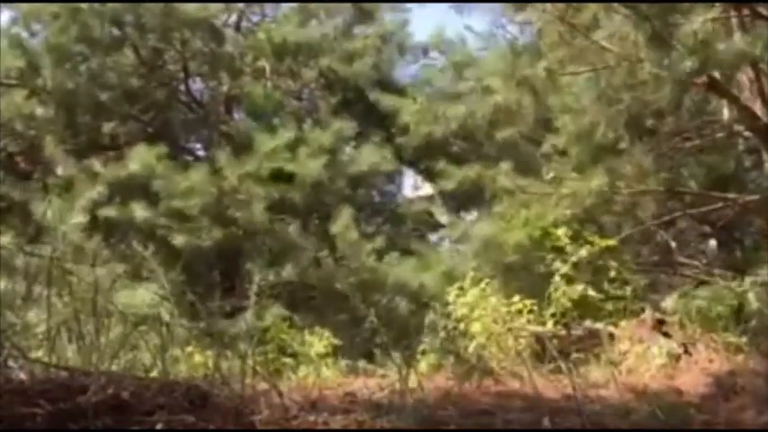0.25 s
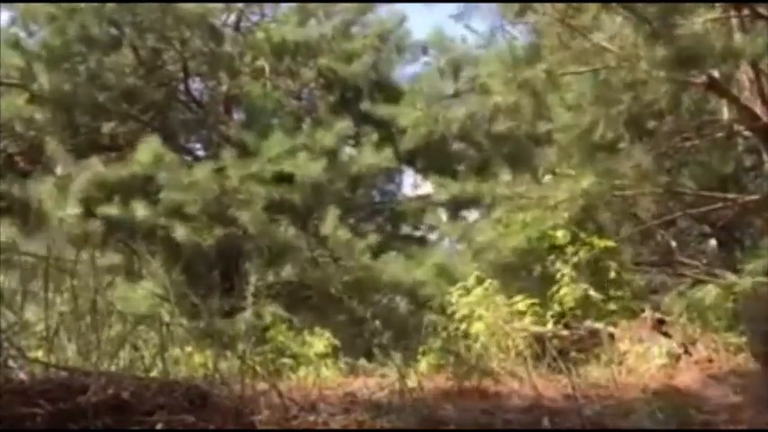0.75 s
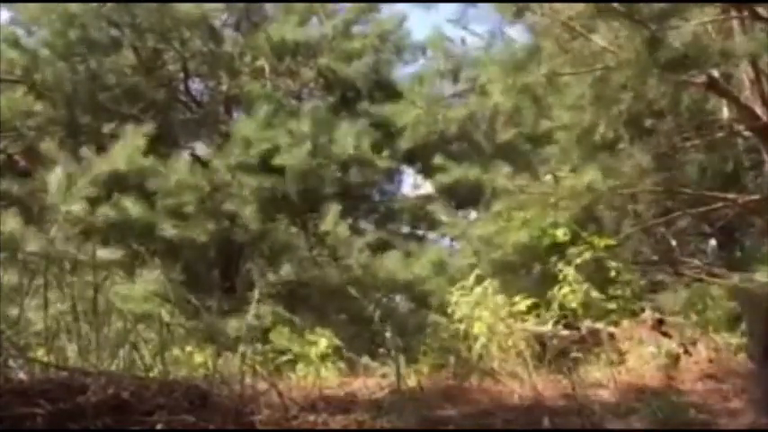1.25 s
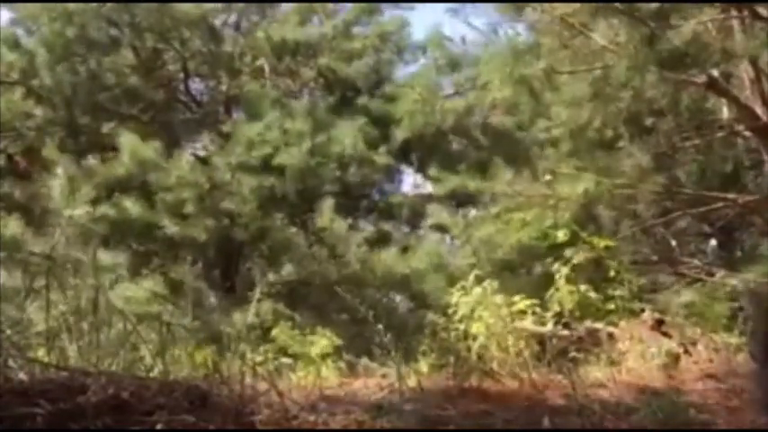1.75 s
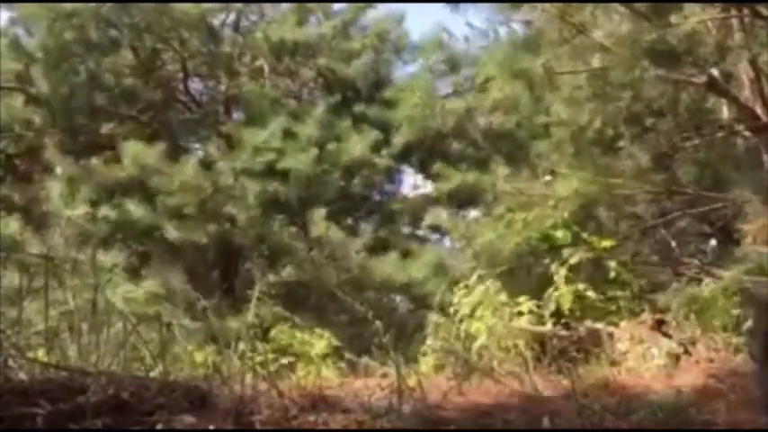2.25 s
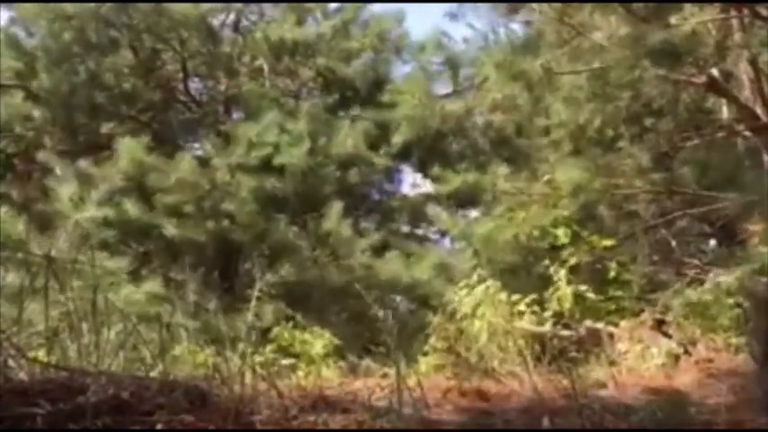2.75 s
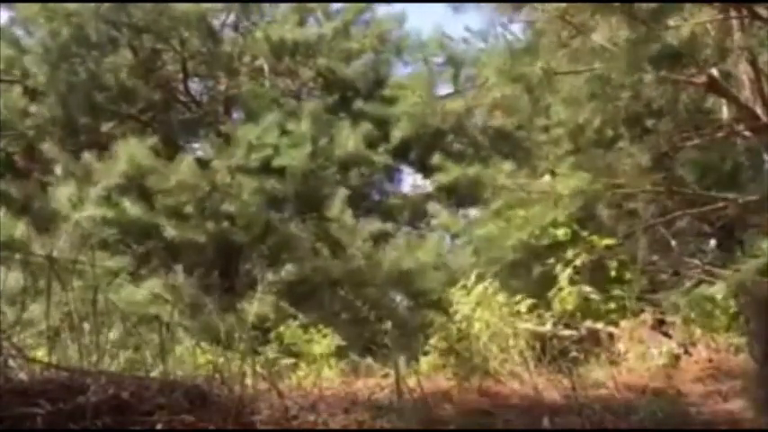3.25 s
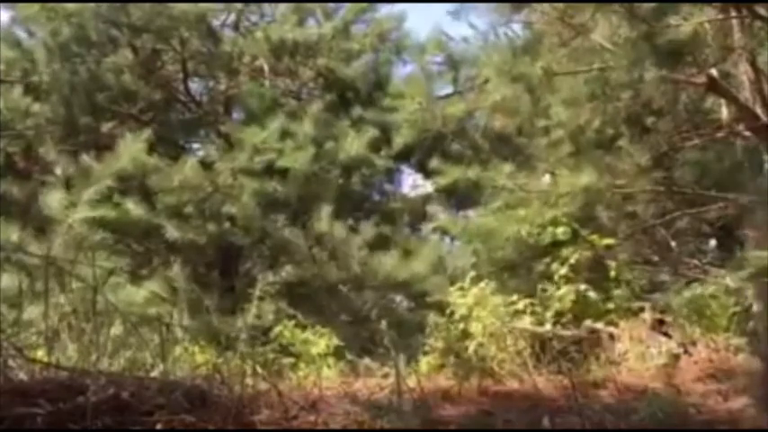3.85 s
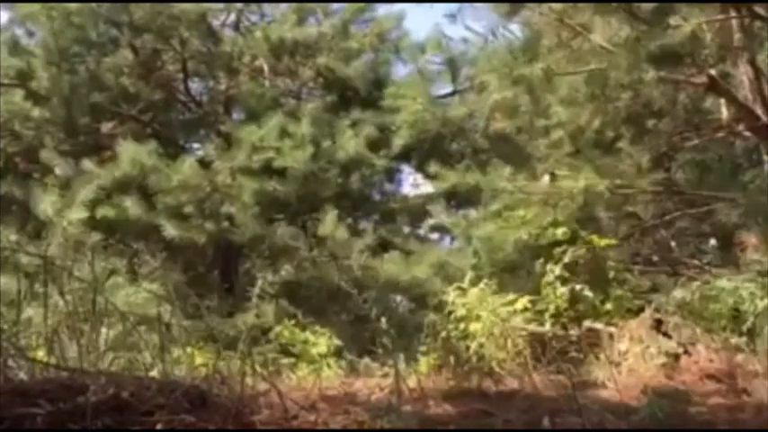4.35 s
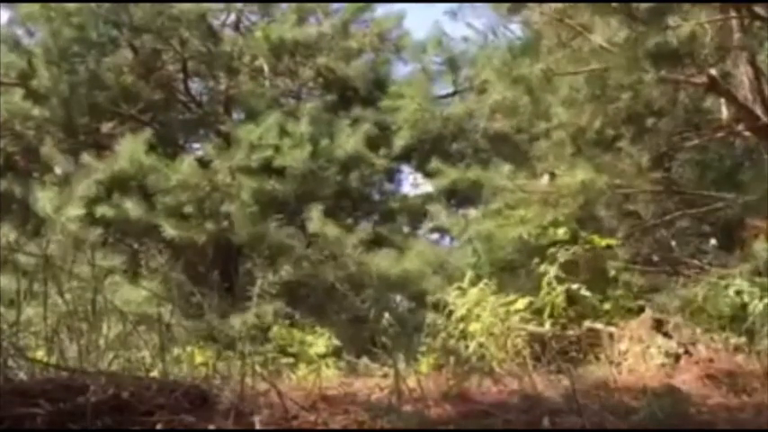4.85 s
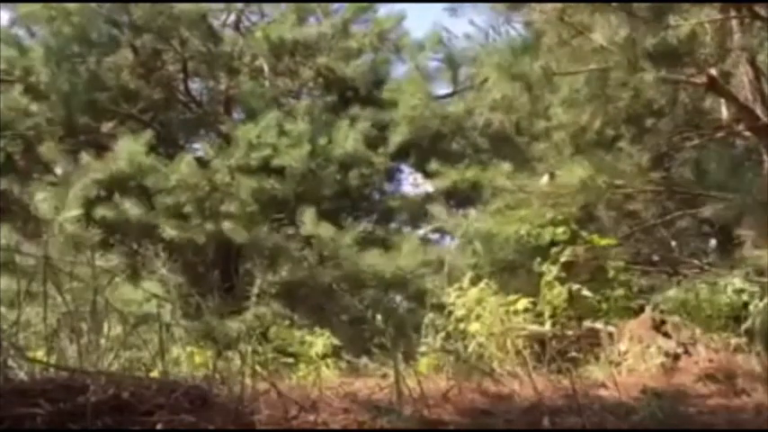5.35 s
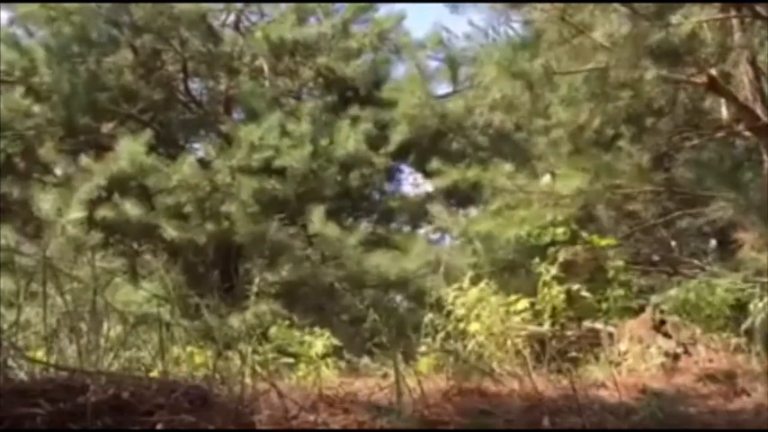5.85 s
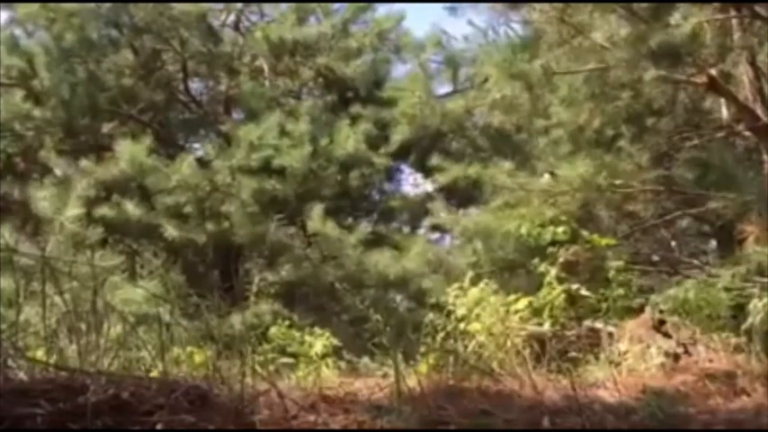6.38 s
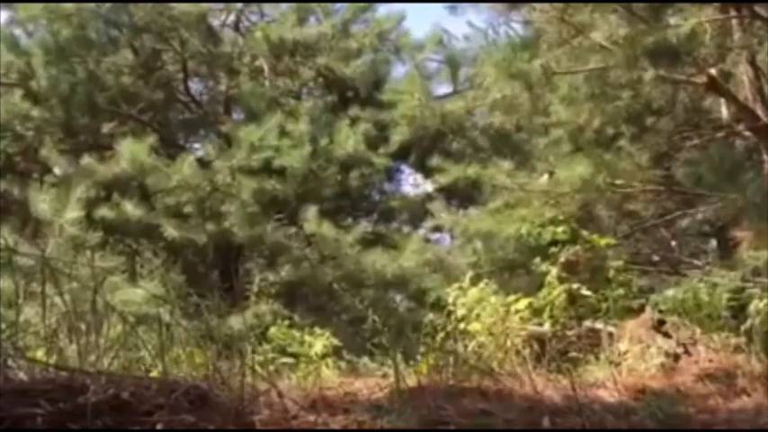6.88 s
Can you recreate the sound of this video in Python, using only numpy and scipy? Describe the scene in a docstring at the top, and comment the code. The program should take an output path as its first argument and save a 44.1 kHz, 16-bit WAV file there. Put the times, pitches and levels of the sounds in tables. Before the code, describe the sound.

Quick, raspy squirrel chatter thins out to softer single squeaks among the trees, with light breeze bumping the microphone.

```python
"""Rattling barks come first: a squirrel scolding from the pines, on one microphone in a quiet wood.
The barks and three hard squeals slow into yelps and single falling squeaks. Each note is a gliding
throat tone of uneven pitch; hard notes add a rasp and a sharp hiss of air. Nearby twigs and trunks
further off scatter the calls faintly. Breeze buffets the microphone; two small ticks sound late on."""
import sys
import numpy as np
from scipy import signal
from scipy.fft import rfft, irfft
from scipy.io import wavfile
from scipy.ndimage import uniform_filter1d

SR = 44100
rng = np.random.default_rng(int(sys.argv[2]) if len(sys.argv) > 2 else 0)


def inscribe(sig):
    """Save sig as 16-bit PCM at rate SR to the path in sys.argv[1].

    A 1-D sig is mono; a 2-D sig holds one channel per row.
    Samples are clipped to [-1, 1] before scaling.
    """
    pcm = np.round(np.clip(np.atleast_2d(sig).T, -1, 1) * 32767)
    wavfile.write(sys.argv[1], SR, pcm.astype(np.int16))


N = 313992


def undb(db):
    """Decibels to gain."""
    return 10 ** (np.asarray(db) / 20)


def unit(x):
    """Scale to rms 1."""
    return x / np.sqrt(np.mean(x ** 2) + 1e-18)


def gains(spectrum, hz):
    """Gain of a spectrum (f/Hz, level/dB) at the given frequencies."""
    f, db = np.transpose(spectrum)
    return undb(np.interp(np.log(hz + 1), np.log(f), db))


def colour(x, spectrum):
    """Filter by a spectrum (f/Hz, level/dB) that falls away beyond its ends."""
    hz = np.arange(len(x) // 2 + 1) * SR / len(x)
    skirts = np.minimum(hz / spectrum[0][0], 1) ** 2 * np.minimum(spectrum[-1][0] / (hz + 1), 1) ** 2
    return irfft(rfft(x) * gains(spectrum, hz) * skirts, len(x))


def noise(spectrum):
    """Coloured noise at rms 1, as long as the scene."""
    return unit(colour(rng.standard_normal(N), spectrum))


def resonance(x, hz, width_hz):
    """One resonance with gain 1 at its centre."""
    return signal.lfilter(*signal.iirpeak(hz, hz / width_hz, fs=SR), x)


def drift(rate_hz, size):
    """Smooth random drift with spread near 1."""
    place = np.arange(size) * rate_hz / SR
    return 1.2 * np.interp(place, np.arange(1024), rng.standard_normal(1024))


def gate(t, length, attack, release):
    """Opens at 0 and closes after length, with soft edges; all in seconds."""
    return (1 + np.tanh(t / attack)) * (1 + np.tanh((length - t) / release)) / 4


def glide(hz, start, end):
    """Pitch at the start, middle and end of a note; start and end are ratios to the middle."""
    return hz * start, hz, hz * end


# The throat's broad low resonance: f/Hz, level/dB
THROAT = [(130, -28), (260, -34.5), (370, 3), (550, 0), (1000, 2), (1350, -0.5), (1700, -11), (2100, -22),
          (2700, -32.5)]
HARMONICS = np.arange(1, 13)[:, None]


def throat_voice(partials, pitch, air, rough):
    """The throat carries the first harmonics, with more breath in a rough note."""
    tone = (partials * gains(THROAT, HARMONICS * pitch) * HARMONICS ** -1.35).sum(axis=0)
    return unit(tone) + 1.68 * rough ** 1.77 * unit(colour(air, THROAT))


# The mouth's upper resonances: f/Hz, level/dB
MOUTH = [(1500, -22.5), (2200, -19), (2700, -14.5), (3150, 0), (3700, 1.5), (4100, 3.5), (4600, -5.5),
         (6200, -4), (7500, -30)]
# Extra resonances of soft notes, jaws nearly shut: f/Hz, width/Hz, level/dB
SHUT_JAW = [(2480, 600, 5.5), (3645, 130, 5)]


def mouth_rasp(partials, pitch, air, rough, level_db):
    """Buzz and breath ring in the mouth; the jaws open for loud notes and move the rasp upwards."""
    buzz = (partials * gains(MOUTH, HARMONICS * pitch) * HARMONICS ** -.4).sum(axis=0)
    rasp = unit(buzz) + (.2 + 1.4 * rough ** 2) * unit(colour(air, MOUTH))
    gape = min(undb(4.7 * (level_db + 43.5)), 1)
    open_jaw = resonance(rasp, hz=5010, width_hz=520)
    shut_jaw = sum(undb(db) * resonance(rasp, hz, width) for hz, width, db in SHUT_JAW)
    return rasp + 1.65 * gape * open_jaw + (1 - gape) * shut_jaw


# Air forced past the teeth: f/Hz, level/dB
TEETH = [(4500, -17), (6300, -14), (7100, -1), (8300, 1), (8750, -3.5), (9200, -11), (9950, -5),
         (10800, -7), (12000, -7.5), (12700, -18.5), (13700, -6.5), (15000, -11.5)]
# Whistles at the teeth: f/Hz, width/Hz, level/dB
WHISTLES = [(8290, 850, -0.5), (9900, 450, 8)]


def teeth_hiss(air, level_db):
    """Air hisses past the teeth and whistles on the hardest notes."""
    hiss = colour(air, TEETH)
    whistle = sum(undb(db) * resonance(hiss, hz, width) for hz, width, db in WHISTLES)
    return hiss + min(undb(level_db + 23), 2) * whistle


NOTE_SAMPLES, LEAD_SAMPLES = 4096, 512  # room for one note; the part of it before the onset


def note(length, pitches, rough, voice_db, rasp_db, hiss_db):
    """One push of air: a gliding, jittering tone with its rasp and hiss."""
    t = (np.arange(NOTE_SAMPLES) - LEAD_SAMPLES) / SR
    length = max(length, .004)
    progress = np.clip(t / length, -.05, 1.05)
    arc = np.polyfit([0, .5, 1], np.log(pitches), 2)
    contour = np.exp(np.polyval(arc, progress))
    # rough notes have cycles of uneven length and strength
    pitch = contour * np.exp(.149 * rough ** 2.8 * drift(600, NOTE_SAMPLES))
    flutter = undb(4.8 * rough * drift(320, NOTE_SAMPLES))
    phase = 2 * np.pi * np.cumsum(pitch) / SR
    partials = np.sin(HARMONICS * phase) * (HARMONICS * pitch < SR / 3)
    air = rng.standard_normal((3, NOTE_SAMPLES)) * (1 + .5 * np.cos(phase))  # escapes once a cycle
    # pressure raises pitch and loudness together; the upper sounds die first as it sinks
    pressure = contour / contour.max()

    voice = throat_voice(partials, pitch, air[0], rough)
    voice *= gate(t, length, attack=.00071 + .13 * length, release=.0011)
    voice *= np.exp(-.25 * progress) * pressure ** .5 * flutter
    # the rasp stops with the tone, while the hiss trails a little
    rasp = mouth_rasp(partials, pitch, air[1], rough, rasp_db)
    rasp *= gate(t - .061 * length, .93 * length, attack=.00081 + .06 * length, release=.0016)
    rasp *= np.exp(-.6 * progress) * pressure ** 2.5 * flutter
    jet = gate(t - .018 * length, length, attack=.00028 + .084 * length, release=.0061)
    jet *= np.exp(-.7 * progress) * pressure ** 1.5 * flutter ** .5
    leak = undb(-42.5) * gate(t, length, attack=.006, release=.0068)  # air between a bark's pulses
    hiss = teeth_hiss(air[2], hiss_db) * (jet + leak)

    def at_level(x, db):
        """Bring the rms, taken over the note's length, to db."""
        return x * undb(db) / np.sqrt(np.sum(x ** 2) / (length * SR) + 1e-18)

    return at_level(voice, voice_db) + at_level(rasp, rasp_db) + at_level(hiss, hiss_db)


CATCH_LEAD_S, CATCH_S, CRY_S, LAST_PULSE_S = .016, .0038, .018, .025
RATTLE_END_HZ, VOICE_FADE_DB, TREBLE_FADE_DB = 450, 1.16, 7.5  # fades are per pulse
# Barks from the pines: t/s, chirp to cry/s, pulse spacing/s, pulse count, chirp f/Hz, cry f/Hz,
# rattle f/Hz, roughness/0-1, voice/dB, rasp/dB, hiss/dB, cry's rasp and hiss over the chirp's/dB,
# rattle voice/dB, rattle rasp/dB
BARKS = [(-0.021, 0.016, 0.027, 2, 800, 778, 643, 0.72, -36.5, -40.5, -28.5, 1, -36.5, -44),
         (0.134, 0.02, 0.021, 3, 808, 788, 649, 0.7, -36.5, -37, -30.5, -2, -39, -45),
         (0.300, .017, .027, 3, 640, 777, 635, 0.73, -38.5, -37, -32.5, -2, -38, -47.5),
         (0.482, .017, 0.025, 4, 827, 779, 643, .7, -37, -39.5, -31.5, 0.5, -36, -43),
         (0.684, 0.017, .025, 2, 616, 770, 627, 0.71, -37.5, -35, -30.5, -1.5, -41.5, -56),
         (0.835, .019, 0.023, 2, 716, 685, 475, 0.86, -40.5, -42.5, -39, 5, -41.5, -76),
         (0.973, .020, .025, 2, 914, 884, 628, .66, -37, -39.5, -35.5, -2, -39, -59.5),
         (1.129, 0.018, .027, 4, 821, 1015, 657, 0.74, -38, -38.5, -35.5, 3.5, -37, -51.5),
         (1.715, 0.019, 0.026, 4, 963, 700, 576, 0.6, -37.5, -37.5, -32.5, -6, -36, -45),
         (1.915, 0.02, 0.025, 2, 982, 655, 541, 0.58, -36, -42, -36, -2.5, -38.5, -58),
         (2.089, .019, 0.026, 2, 974, 659, 567, 0.64, -36.5, -40, -35.5, -4.5, -39, -59),
         (2.247, 0.019, 0.022, 1, 975, 1035, 648, 0.56, -33.5, -36, -31, -6.5, -43.5, -65),
         (2.379, .018, 0.021, 1, 1076, 1035, 762, 0.47, -33, -38.5, -29.5, -2.5, -46.5, -58),
         (2.504, .017, 0.015, 1, 1033, 1257, 842, 0.37, -33, -42.5, -34.5, 0, -46, -64),
         (2.766, .016, 0.021, 1, 1190, 1104, 633, 0.38, -33.5, -38, -28.5, -10, -42.5, -65),
         (2.905, 0.017, 0.022, 2, 776, 635, 587, 0.6, -38, -50, -48.5, -5, -44, -74),
         (3.33, 0.012, .021, 1, 1068, 1124, 940, .46, -35, -40.5, -34, -1.5, -49.5, -75),
         (3.464, 0.018, 0.024, 2, 760, 595, 394, 0.54, -39.5, -51, -51.5, -1, -42.5, -68),
         (3.610, 0.02, 0.027, 2, 1100, 800, 450, 0.55, -37.5, -35.5, -32.5, -9, -39.5, -60),
         (5.466, .018, 0.023, 5, 794, 559, 570, 0.5, -43, -59, -60, -2, -41, -66),
         (5.912, 0.016, .027, 2, 783, 495, 560, 0.54, -40.5, -69, -61, 3, -43.5, -64)]


def bark(start, to_cry, spacing, pulses, chirp_hz, cry_hz, rattle_hz, rough,
         voice_db, rasp_db, hiss_db, cry_db, rattle_db, rattle_rasp_db):
    """The throat catches, chirps up and cries down; the air runs out in sinking, dulling pulses."""
    levels = np.array([voice_db, rasp_db, hiss_db])
    catch_levels = levels + (.5, -12, -14) - 32 * (1 - rough)  # faint before a clean bark
    yield start - CATCH_LEAD_S, note(CATCH_S, glide(529, 1.12, .84), rough, *catch_levels)
    yield start, note(.6 * to_cry, glide(chirp_hz, .8, 1.1), rough, *levels)
    cry_levels = levels + (0, cry_db, cry_db)
    yield start + to_cry, note(CRY_S, glide(cry_hz, 1.15, .76), rough, *cry_levels)
    for k, spent in enumerate(np.linspace(0, 1, pulses)):
        hz = rattle_hz * (RATTLE_END_HZ / rattle_hz) ** (spent ** 2.2)  # holds at first, sinks late
        if k < pulses - 1:
            length, pitches = .7 * spacing, glide(hz, .93, 1.04)
        else:
            length, pitches = LAST_PULSE_S, glide(hz, 1.12, .84)
        treble_db = rattle_rasp_db - k * TREBLE_FADE_DB
        pulse = note(length, pitches, .81 * rough, rattle_db - k * VOICE_FADE_DB, treble_db, treble_db + .5)
        yield start + to_cry + (k + 1) * spacing, pulse


def trees(x, near_db, near_t60, far_db, far_t60):
    """Nearby twigs smear each note; trunks further off return a faint tail."""
    t = np.arange(SR // 2) / SR
    onset = 1 - np.exp(-t / .0016)
    response = 0
    for db, t60 in ((near_db, near_t60), (far_db, far_t60)):
        tail = rng.standard_normal(len(t)) * np.exp(-np.log(1000) * t / t60) * onset
        response += undb(db) * tail / np.linalg.norm(tail)
    return signal.fftconvolve(x, response)[:N]


# Distant air in the wood: f/Hz, level/dB
WOOD_AIR = [(18, -32), (30, -14), (87, -1), (195, -13), (288, -13.5), (364, -17), (538, -15.5),
            (1030, -18.5), (1110, -18), (1370, -26), (1920, -30), (3780, -33.5), (4900, -34), (8920, -38.5),
            (15000, -47)]
# Leaf hiss, strongest early on: t/s, level/dB
LEAF_LEVELS = [(0, -69.5), (1.25, -59.5), (1.6, -71), (3.0, -67), (4.2, -83), (7.12, -71)]


def wood():
    """Distant air in the trees and a light hiss of leaves."""
    far_air = noise(WOOD_AIR) * undb(-52 + 1.3 * drift(4.4, N))
    leaves = noise([(1500, -11), (4000, 1), (8300, -6), (12000, -10), (15000, -12)])
    leaf_db = np.interp(np.arange(N) / SR, *np.transpose(LEAF_LEVELS))
    return far_air + leaves * undb(leaf_db + 1.08 * drift(27, N))


# Wind rumble right at the microphone: f/Hz, level/dB
BUFFET = [(18, -21), (32, -11.5), (48, 0.5), (68, 8), (100, -7.5), (150, -11), (220, -21.5), (400, -62)]
# Gusts on the microphone: peak t/s, half length/s, level/dB
GUSTS = [(0.047, 0.03, -46.5), (0.36, 0.094, -36), (0.498, 0.04, -37.5), (0.615, 0.055, -38),
         (0.958, 0.03, -49), (1.187, 0.096, -51), (1.567, 0.016, -37), (1.792, 0.031, -32.5),
         (1.88, 0.034, -45), (2.016, 0.068, -39.5), (2.527, 0.054, -53), (4.123, 0.15, -56)]


def breeze():
    """Low eddies buffet the microphone, in gusts over a faint wavering draught."""
    t = np.arange(N) / SR
    eddies = noise(BUFFET)
    eddies /= np.sqrt(uniform_filter1d(eddies ** 2, size=3000) + .02)  # even strength within a gust
    gusts = sum(undb(db) * np.exp(-((t - peak) / half) ** 2) for peak, half, db in GUSTS)
    draught = undb(-57.5 + 2.4 * drift(7.1, N))
    return eddies * (gusts + draught)


# Spits of air ahead of some barks: t/s, length/s, level/dB
SPITS = [(0.464, 0.021, -48.5), (0.666, 0.019, -42.5), (0.818, 0.023, -44), (0.957, 0.018, -51),
         (5.391, 0.026, -60.5)]
# Their colour at the teeth: f/Hz, level/dB
SPIT_SPECTRUM = [(3800, -16), (4700, 3.5), (6000, -6), (7600, 5), (9500, -11), (11800, 3), (15000, -17)]


def spits():
    """Unvoiced air spits through the teeth, starting and stopping sharply."""
    t = np.arange(N) / SR
    bursts = sum(undb(db) * gate(t - start, length, attack=.0018, release=.002)
                 for start, length, db in SPITS)
    return bursts * noise(SPIT_SPECTRUM)


# Hard squeals: t/s, rise/s, hold/s, rise f/Hz, hold f/Hz, hold roughness/0-1, rise voice/dB,
# rise rasp/dB, rise hiss/dB, hold voice/dB, hold rasp/dB, hold hiss/dB, mouth ring/dB
SQUEALS = [(1.339, .009, 0.024, 1193, 1652, 0, -30, -40.5, -20, -50.5, -47, -22.5, 9.5),
           (1.447, .018, .016, 1482, 1400, .45, -34, -36.5, -19, -47, -45, -43, -9),
           (3.775, .014, .021, 1392, 1345, 0.51, -36, -33, -26, -40.5, -33.5, -29, -10.5)]


def squeal(start, rise_s, hold_s, rise_hz, hold_hz, rough, voice_db, rasp_db, hiss_db,
           hold_db, hold_rasp_db, hold_hiss_db, ring_db, rise_rough=.42, break_s=.0025):
    """The pitch shoots up, then holds on a thin hissing note whose overtone rings in the mouth."""
    yield start, note(rise_s, glide(rise_hz, .79, 1.2), rise_rough, voice_db, rasp_db, hiss_db)
    held = note(hold_s, glide(hold_hz, .96, .94), rough, hold_db, hold_rasp_db, hold_hiss_db)
    ring = undb(ring_db) * resonance(held, hz=3280, width_hz=200)
    yield start + rise_s + break_s, held + ring


# Yelps: t/s, note/s, whine/s, note f/Hz, bend (end over middle pitch), whine f/Hz, roughness/0-1,
# voice/dB, rasp/dB, hiss/dB, whine rasp/dB
YELPS = [(1.566, 0.018, 0.049, 849, 0.95, 568, 0.37, -39, -52, -49.5, -66),
         (2.632, .013, 0.041, 766, 0.96, 573, 0.47, -38, -49.5, -54.5, -65),
         (3.058, 0.011, 0.027, 861, 1.15, 675, 0.51, -36.5, -42, -36, -46.5),
         (3.198, 0.011, .032, 844, 0.93, 594, 0.39, -38, -44, -41.5, -56.5),
         (3.897, .021, 0.032, 700, 0.85, 465, 0.57, -41.5, -53, -58, -67),
         (4.340, 0.0084, 0.038, 913, 1, 614.5, 0.37, -35.5, -45, -49, -62.5),
         (4.552, .016, 0.017, 840, 1.12, 694, 0.5, -37.5, -46.5, -55, -54),
         (4.652, 0.022, 0.038, 702, 0.89, 480, 0.28, -39, -46.5, -58.5, -78),
         (5.297, 0.015, .034, 1085, 1.11, 720, 0.44, -38.5, -54, -56, -58.5),
         (5.728, 0.0096, 0.06, 835, 0.82, 538, 0.23, -40.5, -64, -65, -74.5)]


def yelp(start, length, whine_s, hz, bend, whine_hz, rough,
         voice_db, rasp_db, hiss_db, whine_rasp_db, break_s=.0036):
    """A short note breaks into a lower, softer, sinking whine."""
    yield start, note(length, glide(hz, 1 / bend, bend), rough, voice_db, rasp_db, hiss_db)
    whine_levels = voice_db - 3, whine_rasp_db, whine_rasp_db - 5.5
    yield start + length + break_s, note(whine_s, glide(whine_hz, 1.17, .83), rough, *whine_levels)


# Single squeaks as the scolding slows: t/s, length/s, middle f/Hz, fall/octaves, arch/octaves,
# roughness/0-1, voice/dB, rasp/dB, hiss/dB
SQUEAKS = [(4.051, 0.029, 758, 0.91, 0.19, 0.44, -36.5, -57.5, -54.5),
           (4.169, 0.02, 623, 0.56, 0, 0.35, -41, -69.5, -73.5),
           (4.242, .036, 820, 1.13, 0.24, 0.4, -38.5, -58.5, -66),
           (4.473, 0.028, 696, 0.77, 0.07, 0.3, -39.5, -53.5, -64.5),
           (4.805, 0.045, 685, 1.25, 0.38, 0.38, -42.5, -55.5, -68),
           (4.965, 0.045, 397.5, 1.1, .06, 0.39, -47.5, -86.5, -90),
           (5.106, 0.047, 638, 0.77, -0.2, 0.31, -44.5, -61.5, -69.5),
           (5.212, 0.021, 599.5, .85, 0, 0.57, -47, -83, -86.5),
           (5.355, 0.049, 392, 0.14, 0.15, 0.34, -48.5, -73, -75),
           (6.103, 0.028, 555, 0.38, -.15, 0.27, -44.5, -75, -71),
           (6.22, 0.043, 730, 0.58, .1, 0.1, -44.5, -69.5, -70.5),
           (6.426, .031, 728, 1.02, -.08, 0.26, -42.5, -73, -72),
           (6.81, .044, 890, 0.46, 0.44, 0.14, -44.5, -73, -69),
           (6.919, 0.036, 742, 0.7, 0.25, 0.24, -44, -74, -69),
           (7.007, .036, 854, 0.48, 0.49, 0.37, -43.5, -69, -68),
           (7.094, 0.03, 979, 0.069, 0.38, 0.2, -41.5, -66, -67)]


def squeak(start, length, hz, fall, arch, rough, *levels):
    """One note that arches over and falls."""
    pitches = glide(hz, 2 ** (fall / 2 - arch), 2 ** (-fall / 2 - arch))
    yield start, note(length, pitches, rough, *levels)


# Small dry ticks in the wood: t/s, level/dB
TICKS = [(5.838, -42.5), (5.969, -36.5)]


def ticks(decay_s=.0038):
    """Short bright snaps of noise."""
    t = np.arange(N) / SR
    snaps = sum(undb(db) * (t >= start) * np.exp(-np.abs(t - start) / decay_s) for start, db in TICKS)
    spectrum = [(3500, -7), (4400, 3), (6000, -12), (8300, 1), (10000, -1), (15000, -3)]
    return colour(snaps * rng.standard_normal(N), spectrum)


def squirrel():
    """The whole scolding: each call yields its notes as (t/s, sound), laid in at their moments."""
    track = np.zeros(N + 2 * SR)  # a spare second at each end
    for call, rows in ((bark, BARKS), (yelp, YELPS), (squeal, SQUEALS), (squeak, SQUEAKS)):
        for row in rows:
            for start, sound in call(*row):
                i = SR + int(start * SR) - LEAD_SAMPLES
                track[i:i + len(sound)] += sound
    return track[SR:SR + N]


def scene():
    """At the microphone: the squirrel among the trees, over the wood and the breeze."""
    direct = squirrel() + spits() + ticks()
    scatter = trees(direct, near_db=-9, near_t60=.058, far_db=-34.5, far_t60=.35)
    return (direct + scatter + wood() + breeze())[None]


def record(dry):
    """The recorder cuts the top steeply."""
    top_hz = 14950
    return signal.sosfilt(signal.ellip(8, .2, 70, top_hz, fs=SR, output="sos"), dry)


dry = scene()
out = record(dry)
inscribe(out)
```